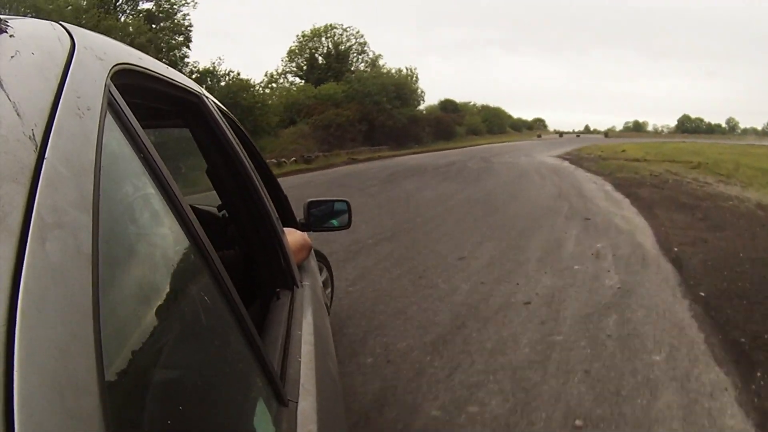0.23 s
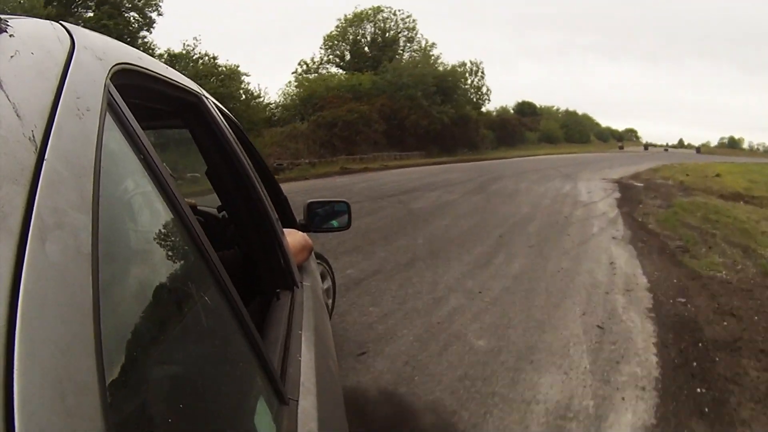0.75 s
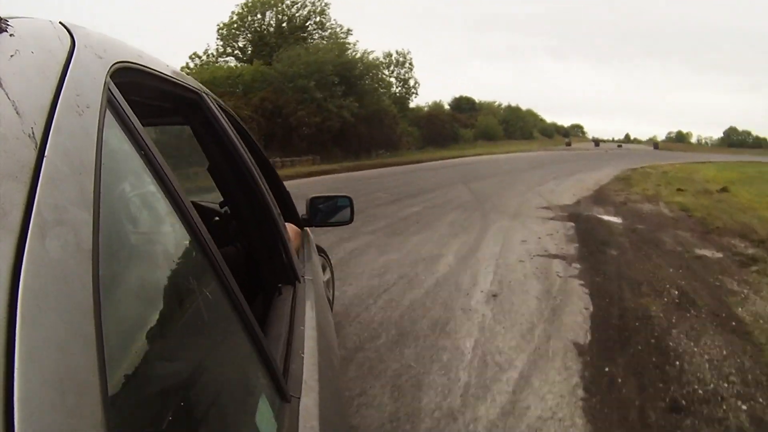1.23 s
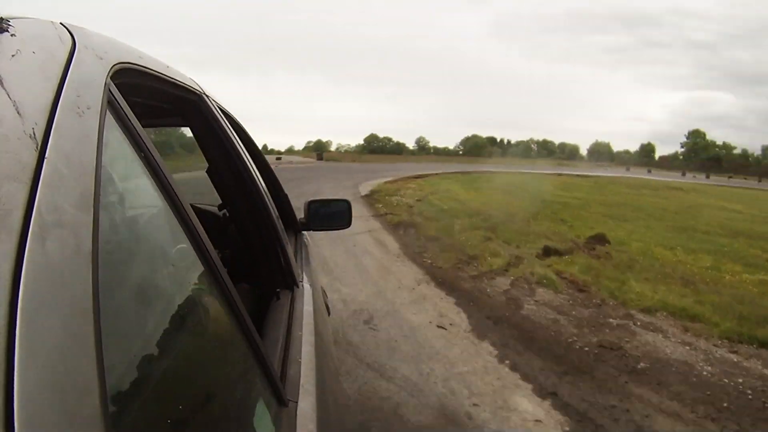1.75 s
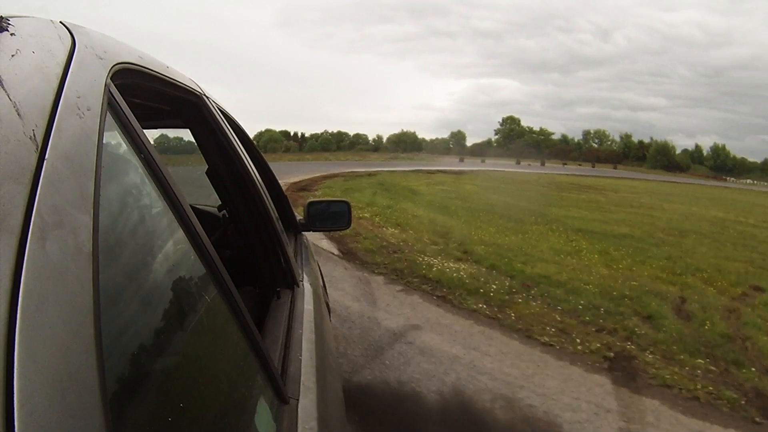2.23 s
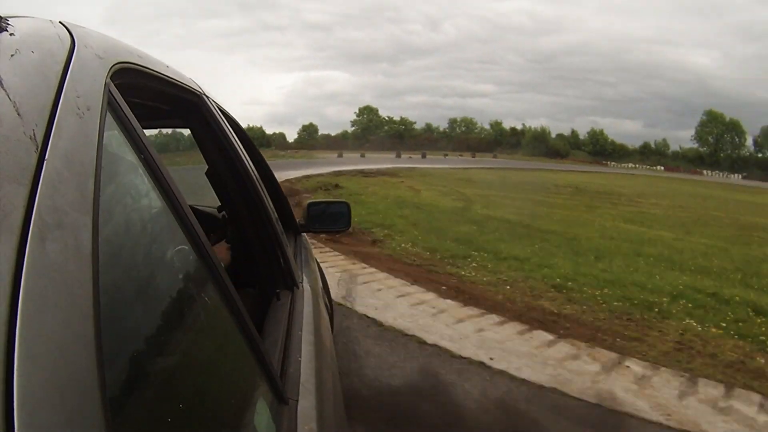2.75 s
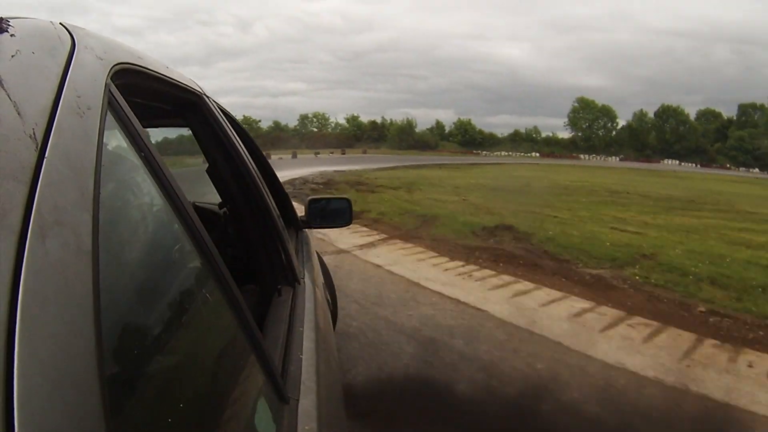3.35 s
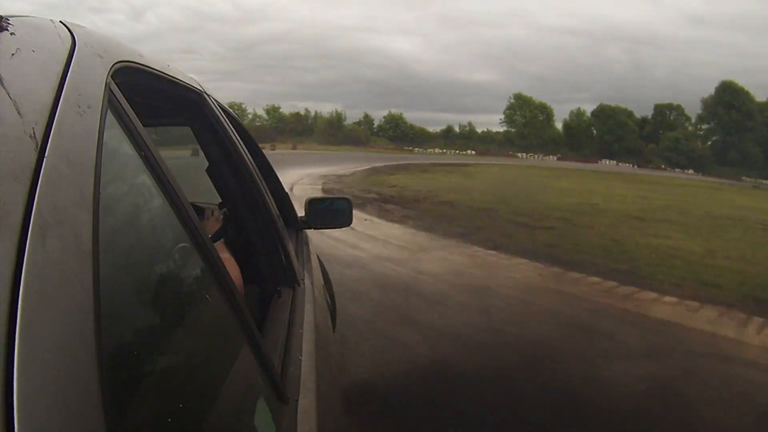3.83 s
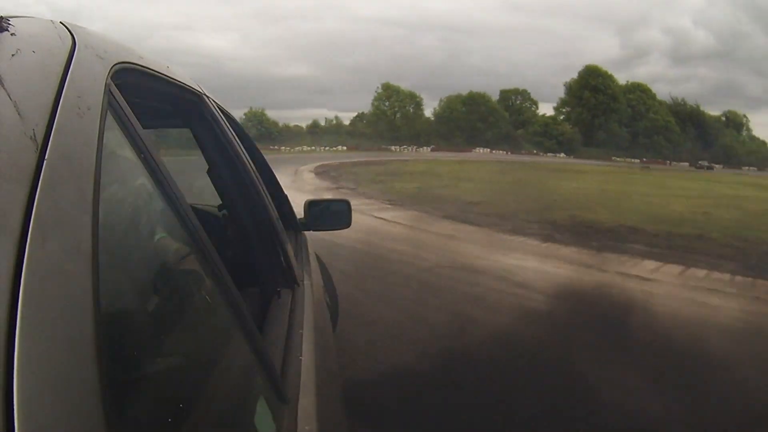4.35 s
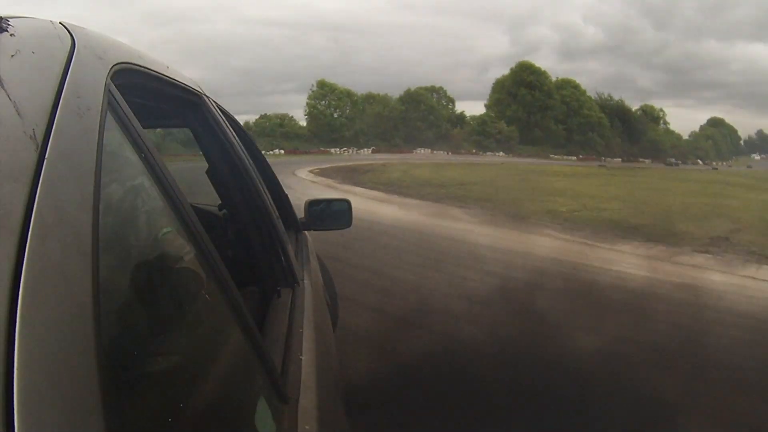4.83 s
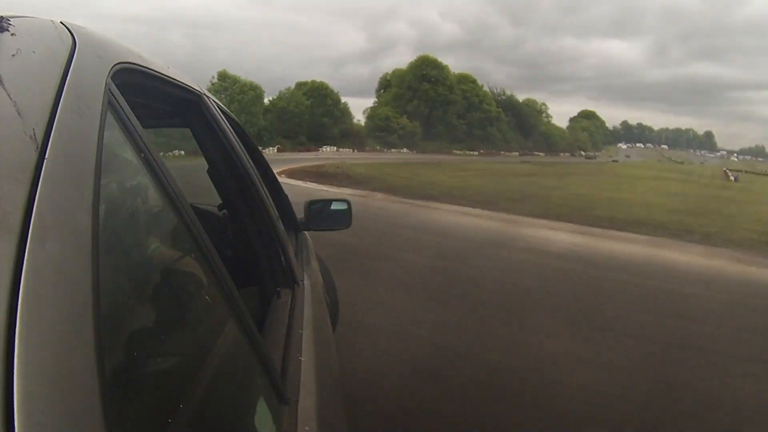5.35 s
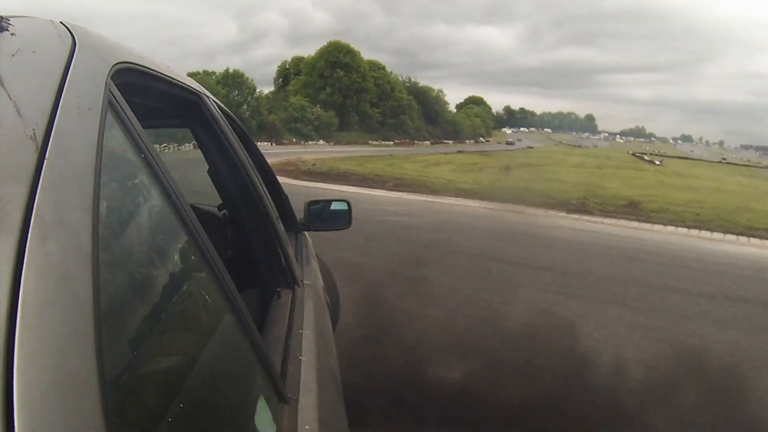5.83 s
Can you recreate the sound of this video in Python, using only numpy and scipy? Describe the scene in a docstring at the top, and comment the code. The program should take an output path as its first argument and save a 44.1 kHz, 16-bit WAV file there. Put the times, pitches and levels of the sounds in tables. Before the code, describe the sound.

Outdoors, from a microphone on the flank of a drifting diesel car, close and dry, the same in both channels. From 0 to 1.4 s a rear tyre squeals around 1050 Hz, wavering and rough, with a hoarse second tyre, rasping rubber and bright gritty hiss over a low engine drone that sinks. Around 1.2-1.5 s the engine drops sharply, short yelps slip out, bumps thud in the body panels and the squeal dies. At about 1.7 s a gust rumbles as the squeal returns, dipping near 1200 Hz, then rising toward 1330 Hz by 2.5 s while the revs climb. From 2.6 to 5.4 s it stutters in quick, uneven throbs amid heavy scrubbing, road roar, body boom and wind buffets. From 5.4 s the engine eases lower and the squeal becomes louder and more continuous, sliding down slightly and still sounding at 6 s.

```python
"""Turbodiesel drifting through an S-bend

A six-cylinder car is heard at a housing on its flank. Its rear tyres squeal by stick-slip in one slide,
grip briefly as the car swings over, then squeal higher, in throbs; a second, hoarse tyre adds noisy tones.
Scrubbing rubber is noise through tread resonances, grit is clumped hiss that throbs at the firing rate.
The exhaust is a sum of harmonic orders; wind, body boom, road roar and panel thuds are shaped noise."""
import sys
import numpy as np
from scipy import signal
from scipy.fft import rfft, irfft, next_fast_len
from scipy.io import wavfile
from scipy.ndimage import uniform_filter1d, minimum_filter1d

SR = 44100
rng = np.random.default_rng(int(sys.argv[2]) if len(sys.argv) > 2 else 0)


def int16_out(signal):
    """Quantize to a 16-bit WAV file."""
    q = np.round(np.clip(np.atleast_2d(signal).T, -1, 1) * 32767)
    wavfile.write(sys.argv[1], SR, q.astype(np.int16))


N = 268128
TIME = np.arange(N) / SR


def from_db(db):
    """Logarithmic level: 20 dB is a factor of ten in amplitude."""
    return 10 ** (np.asarray(db) / 20)


def rms_one(x):
    """Power normalisation: the mean square becomes one."""
    return x / np.sqrt(np.mean(x ** 2) + 1e-20)


def in_time(rows):
    """Linear interpolation: the columns after t/s, sample by sample."""
    t, *columns = np.transpose(rows)
    return [np.interp(TIME, t, column) for column in columns]


def swells(centre_s, length_s):
    """Gaussian surge of height 1, at half power over the given length."""
    return np.exp(-2 * np.log(2) * ((TIME - centre_s) / length_s) ** 2)


def drift(rate_hz):
    """Low-pass noise: a smooth random wander of spread 1, made at a twentieth of the sample rate."""
    pole = np.exp(-40 * np.pi * rate_hz / SR)
    noise = rng.standard_normal(N // 20 + 2002)
    slow = signal.lfilter([1], [1, -2 * pole, pole * pole], noise)[2000:]
    return np.interp(np.arange(N) / 20, np.arange(len(slow)), rms_one(slow))


def coloured(x, spectrum):
    """Spectral shaping: a gain through (f/Hz, level/dB) points, with falling skirts; unit power."""
    size = next_fast_len(N)
    hz = np.maximum(np.arange(size // 2 + 1) * SR / size, 1)
    points, db = np.transpose(spectrum)
    gain = from_db(np.interp(np.log(hz), np.log(points), db))
    skirts = np.minimum(hz / points[0], 1) ** 2 * np.minimum(points[-1] / hz, 1) ** 2
    return rms_one(irfft(rfft(x, size) * gain * skirts, size)[:N])


def resonances(modes, drive):
    """Modal response: steep resonances, each shaken by its own noise under a common drive; unit power."""
    total = 0
    for hz, width_hz, db in modes:
        pole = np.exp(-np.pi * width_hz * np.sqrt(2) / SR)
        b = (1 - pole * pole) / 2 * np.array([1, 0, -1])
        a = [1, -2 * pole * np.cos(2 * np.pi * hz / SR), pole * pole]
        once = signal.lfilter(b, a, drive * rng.standard_normal(N))
        total = total + from_db(db) * signal.lfilter(b, a, once)
    return rms_one(total)


def phase_of(hz):
    """Phase is the running integral of frequency."""
    return 2 * np.pi * np.cumsum(hz) / SR


def tone(phase, flutter, flutter_hz):
    """Narrow-band modulation: a line whose strength and phase shake at random; unit power."""
    in_phase = (1 + flutter * drift(flutter_hz)) * np.sin(phase)
    return rms_one(in_phase + flutter * drift(flutter_hz) * np.cos(phase))


# spectrum of the wind on the housing: f/Hz, relative level/dB
BUFFET = [(12, -2.5), (26, 1), (32, -4.5), (50, -8), (70, -15.5), (110, -22.5)]
# gusts, the longest as the car swings over: t/s, length/s, rise of level/dB
GUSTS = [(1.7, 0.38, 6.5), (3.448, 0.13, 6.5), (4.101, 0.17, 3), (4.744, 0.096, 5.5)]


def wind():
    """Turbulent pressure: gusts raise low-frequency noise on the housing."""
    level_db = -23.5 + sum(rise_db * swells(s, length) for s, length, rise_db in GUSTS)
    return from_db(level_db) * coloured(rng.standard_normal(N), BUFFET)


# spectrum of the body's boom: f/Hz, relative level/dB
BOOM = [(50, -15.5), (66, -2), (77, 5.5), (88, -2), (105, -34), (125, -6.5), (145, -5), (180, -14),
        (215, -10.5), (280, -41), (450, -42.5)]
# course of the boom, before a common 1 dB gain: t/s, level/dB
BOOM_LEVEL = [(0.0, -26), (0.49, -22.5), (0.69, -28), (1.52, -20), (1.71, -28), (1.96, -22.5),
              (2.22, -26.5), (2.45, -21), (2.84, -29), (2.95, -20.5), (3.69, -33), (3.83, -22.5),
              (5.2, -28.5), (6.08, -24.5)]


def body_boom():
    """Enclosure resonance: low noise gathers in a few peaks and its level rises and falls."""
    level_db, = in_time(BOOM_LEVEL)
    return from_db(level_db + 1) * coloured(rng.standard_normal(N), BOOM)


# spectrum of the road roar: f/Hz, relative level/dB
ROAD = [(100, 15), (210, 12.5), (270, 9.5), (330, 10.5), (400, 5), (480, 6.5), (620, -1), (900, -9.5),
        (2000, -6.5)]


def road_roar(slip_db, dirt_db, surface_db):
    """Contact noise: the road roars the more with slip, dirt and rough track."""
    # each influence counts by a share of its swing in dB
    level_db = -33 + 0.43 * slip_db + 0.18 * (dirt_db + 45.5) + 0.89 * surface_db
    return from_db(level_db) * coloured(rng.standard_normal(N), ROAD)


# bumps in the track: t/s, length/s, level/dB
BUMPS = [(.52, .06, -23), (1.366, .08, -22.5), (1.53, 0.028, -19)]
# body panels that they set booming: f/Hz, width/Hz, relative level/dB
PANELS = [(81.7, 16, -0.5), (131, 10, -6), (203, 7.6, -4)]


def bumps():
    """Structural resonance: the suspension takes a bump and the panels boom."""
    surges = sum(from_db(db) * swells(s, length) for s, length, db in BUMPS)
    return surges * resonances(PANELS, np.ones(N))


def drone_level(firing_hz, throttle_db):
    """Resonant gain: the drone grows with throttle and near the exhaust's resonance; level in dB."""
    centre_hz, half_width_hz, lift_db = 144.2, 3.9, 7.5
    resonance = 1 / (1 + ((firing_hz - centre_hz) / half_width_hz) ** 2)
    return -28.5 + throttle_db + lift_db * resonance


# exhaust orders beside the firing rate, the sixth: multiple of cam rate, level/dB before pipe and load
EXHAUST = [(3, -33), (5, -39), (7, -43), (8, -47), (9, -49), (10, -44.5), (11, -42.5), (12, -40),
           (15, -56.5), (18, -45.5)]
# how tailpipe and body pass the orders: f/Hz, gain as level/dB
PIPE = [(60, 3.5), (215, -10.5), (248, 3), (275, -3), (310, 1.5), (335, -1.5), (354, -9.5), (375, 2),
        (550, -10)]


def engine(firing_hz, drone_db):
    """Harmonic orders: six firings a cam turn make the drone; unequal cylinders add the orders between."""
    cam_hz = firing_hz / 6 * (1 + .003 * drift(12))
    cam_phase = phase_of(cam_hz)
    drone = from_db(drone_db) * tone(6 * cam_phase, 0.09, 12)
    orders = 0
    for k, db in EXHAUST:
        pipe_db = np.interp(round(k) * cam_hz, *np.transpose(PIPE))
        order = tone(round(k) * cam_phase + rng.uniform(0, 2 * np.pi), .3, 6)
        orders = orders + from_db(db + pipe_db) * order
    # the orders follow the drone's swings by a share in dB
    load_gain = from_db(0.42 * (drone_db - drone_db.mean()))
    return drone + load_gain * orders


# rough patches of track, which throw up more grit: t/s, length/s, rise of level/dB
PATCHES = [(1.741, 0.084, 13.5), (2.74, 0.036, 3), (2.989, 0.03, 0.5), (3.1, .07, 3), (3.277, 0.048, 8),
           (3.913, 0.11, 3.5), (4.671, 0.048, 3), (4.971, 0.077, 6.5)]


def rough_track():
    """Surface roughness: placed patches and chance unevenness, as a rise in dB."""
    patches = sum(rise_db * swells(s, length) for s, length, rise_db in PATCHES)
    return patches + drift(19)


# grit hiss through the housing: f/Hz, relative level/dB
GRIT = [(2500, 2), (4000, -4), (4450, -10), (4800, -6), (5500, -6), (5950, -7), (6350, 6), (7600, -1.5),
        (8300, -7), (9500, -13), (10500, -7), (11200, -15.5), (12300, -14.5), (14000, -31)]
# resonances of the wheel arch: f/Hz, width/Hz, relative level/dB
ARCH = [(722, 37, 2.5), (777, 43, -2.5), (4080, 170, -10.5), (4750, 830, -14.5)]


def grit(hiss_db, firing_hz):
    """Modulated noise: rubber crumbs and road spray off in clumps, throb with firing and ring the arch."""
    clumps = from_db(2.0 * drift(110) + drift(8.9))
    spray = clumps * (1 + 0.37 * np.sin(phase_of(firing_hz)))
    hiss = from_db(hiss_db + 2.5) * coloured(spray * rng.standard_normal(N), GRIT)
    # the arch has a flicker of its own and follows just over half of the hiss's swing in dB
    ringing = resonances(ARCH, from_db(3.0 * drift(54)))
    return hiss + from_db(-19.0 + 0.54 * hiss_db) * ringing


# tread resonances that the scrubbing excites: f/Hz, width/Hz, relative level/dB
TREAD = [(1023, 109, -7.5), (1235, 37, 2.5), (1348, 114, 6), (1531, 87, 3), (1688, 145, 0.5)]
# the higher cluster, the rasp: f/Hz, width/Hz, relative level/dB
RASP = [(2095, 174, 5.5), (2326, 110, 1.5), (2772, 220, 0), (3070, 550, -5.5)]


def scrub(scrub_db, rasp_db, surface_db):
    """Incoherent stick-slip: tread blocks out of step judder and ring in clusters around the squeal."""
    judder = from_db(1.5 * drift(44))
    rubber = from_db(scrub_db) * resonances(TREAD, judder) + from_db(rasp_db) * resonances(RASP, judder)
    return from_db(0.51 * surface_db) * rubber   # about half of the track's rise


# the other rear tyre's pitch, before jitter: t/s, f/Hz
HOARSE_PITCH = [(0, 1326), (1.25, 1353), (2.3, 1314), (3.3, 1468), (3.9, 1480), (4.2, 1298), (4.7, 1287),
                (5.25, 1523), (5.6, 1346)]
# its short yelps as it catches, before waver: t/s, f/Hz, length/s, level/dB
YELPS = [(1.21, 1370, 0.0044, -14), (1.411, 1752, 0.0085, -16.5), (1.43, 2040, 0.017, -24),
         (1.457, 1232, 0.027, -22), (1.707, 1353, 0.018, -13), (1.752, 1117, 0.014, -25),
         (2.043, 1308, 0.0072, -16.5)]


def hoarse_tyre(slip_db):
    """Irregular stick-slip: the other tyre never settles on a clean note, except in brief yelps."""
    hz, = in_time(HOARSE_PITCH)
    level_db = -26.5 + slip_db + 0.002 * (hz - 1277)
    out = from_db(level_db) * tone(phase_of(hz * (1 + .025 * drift(59.0))), 1.0, 110)
    waver = 1 + 0.012 * drift(79)
    for s, pitch_hz, length, db in YELPS:
        out = out + from_db(db) * swells(s, length) * tone(phase_of(pitch_hz * waver), 0.51, 100)
    return out


# the squealing tyre's first slide, before bites and waver: t/s, stick-slip f/Hz, level/dB
FIRST_SLIDE = [(0, 1091, -18.5), (.3, 1038, -17), (.55, 1048, -19), (.7, 1041, -16), (1.1, 1078, -17.5),
               (1.28, 1044, -16.5), (1.43, 1052, -22), (1.47, 1058, -40), (1.53, 1055, -31)]
# its second slide, before bites and waver: t/s, stick-slip f/Hz, level/dB
SECOND_SLIDE = [(1.59, 1500, -44), (1.65, 1434, -35), (1.77, 1222, -19.5), (1.9, 1190, -26.5),
                (2.019, 1175, -22.5), (2.2, 1211, -17), (2.5, 1329, -20.5), (3.151, 1312, -22.5),
                (3.752, 1343, -35), (4.6, 1321, -27), (5.1, 1350, -30.5), (5.39, 1355, -27),
                (5.48, 1314, -16), (5.72, 1250, -17), (6.08, 1259, -18.5)]
FIRST_END_S, SECOND_START_S = FIRST_SLIDE[-1][0], SECOND_SLIDE[0][0]


def slides():
    """Stick-slip needs sliding: pitch and level of the squeal, which dies away in the grip between."""
    hz, level_db = in_time(FIRST_SLIDE + SECOND_SLIDE)
    gripping_s = np.maximum(0, np.minimum(TIME - FIRST_END_S, SECOND_START_S - TIME))
    fade_db_per_s = 497   # with distance from the nearer slide
    return hz, level_db - fade_db_per_s * gripping_s


def held(start_s, length_s):
    """Envelope: linear attack, hold and release of a bite."""
    attack_s, release_s = 0.011, 0.013
    rise = .5 + (TIME - start_s) / attack_s
    fall = (start_s + length_s - TIME) / release_s
    return np.clip(np.minimum(rise, fall), 0, 1)


# bites of the tread in the second slide: t/s, length/s, level/dB before a common 1.5 dB gain
BITES = [(2.572, 0.036, -15), (2.628, 0.052, -16), (2.68, 0.04, -17), (2.73, 0.058, -16),
         (2.822, 0.058, -15), (2.985, 0.032, -16), (3.169, 0.034, -16), (3.295, 0.044, -15),
         (3.386, 0.03, -18), (3.466, 0.06, -16), (3.548, 0.03, -18), (3.606, 0.042, -14),
         (3.694, 0.034, -17), (3.771, 0.032, -15), (4.003, 0.034, -18), (4.173, 0.04, -16),
         (4.242, 0.03, -16), (4.316, 0.066, -15), (4.406, 0.05, -16), (4.476, 0.04, -17),
         (4.566, 0.054, -16), (4.645, 0.084, -17), (4.793, 0.06, -15), (4.873, 0.032, -19),
         (5.051, 0.066, -15), (5.13, 0.046, -15), (5.204, 0.07, -13), (5.288, 0.058, -14),
         (5.368, 0.052, -14)]


def bite_strength():
    """Load on the contact: amplitude that the bites add."""
    return sum(from_db(db + 1.5) * held(s, length) for s, length, db in BITES)


def biting():
    """Contact state: 1 while the tread bites, 0 in between."""
    return np.minimum(sum(held(s, length) for s, length, db in BITES), 1)


def squeal_pitch(hz):
    """Frequency pulling: the note sags around each bite's onset and pulls up again."""
    depth_hz, decay_s = 29.85, .01
    sag = sum(np.exp(-np.abs(TIME - s) / decay_s) for s, length, db in BITES)
    return hz - depth_hz * sag


def squeal(hz, level_db):
    """Stick-slip oscillation: tread sticks and slips at a wavering pitch; a hard bite makes it louder."""
    # the higher the note, the purer; the overtones also dull as the first slide ends
    overtone_db = -1.5 - 0.0436 * (hz - 1013)
    overtone_db = overtone_db - 7.5 * swells(FIRST_END_S, 0.31)
    strength = np.hypot(from_db(level_db), bite_strength())
    # coarse asphalt shakes the grip, less in a bite: where it loosens the note thins and jumps up
    loose = 1 - 0.44 * biting()
    grip = loose * (.5 * drift(30) + .85 * drift(110))
    waver = loose * (.012 * drift(70) + .006 * drift(10)) - .005 * grip
    phase = phase_of(squeal_pitch(hz) * (1 + waver))
    shake = rms_one(np.maximum(1 + .32 * grip, .1))
    fundamental = tone(phase, .25 * loose, 130)
    # the second partial frays as the note is driven higher; the third lies 90 Hz sharp
    spread_hz = np.interp(hz, [1050, 1200], [14, 75])
    second = tone(2 * phase + phase_of(spread_hz * drift(90)), .45, 150)
    third = tone(3 * phase + phase_of(np.full(N, 90.0)), 1.0, 50)
    low_pass = signal.cheby1(8, .5, 3400, fs=SR, output="sos")
    overtones = signal.sosfilt(low_pass, second + from_db(-11) * third)
    return strength * shake * (fundamental + from_db(overtone_db) * overtones)


# the engine: t/s, firing f/Hz, throttle as relative level/dB
REVS = [(0, 188, 1), (.28, 173, -5), (.6, 171, -5.5), (1.05, 163, -0.5), (1.25, 150, -25), (1.47, 123, -5),
        (1.8, 125, 2), (1.95, 131, -8), (2.2, 143, 4), (2.7, 166, -3), (3.3, 171, 3), (3.55, 170, -2.5),
        (3.97, 177, 4.5), (4.5, 165, -1), (4.8, 168, 1.5), (5.3, 163, 0), (5.7, 144, -3), (6.08, 147, -1.5)]
# the sliding rubber, before rough track: t/s, scrub level/dB, rasp level/dB
SLIP = [(0, -23.5, -20), (.55, -27.5, -27), (1, -27.5, -25), (1.2, -23.5, -23.5), (1.42, -29.5, -33.5),
        (1.53, -38, -36), (1.64, -36.5, -42), (1.9, -27.5, -33.5), (2.24, -21.5, -26.5),
        (2.9, -21.5, -29.5), (3.5, -22.5, -29), (4.1, -21.5, -26.5), (4.5, -19, -27), (4.97, -19.5, -29.5),
        (5.15, -24, -28.5), (5.35, -25, -26.5), (5.5, -20, -26), (6.08, -20.5, -26)]
# loose dirt under the tyres, as its hiss before gain and rough track: t/s, level/dB
DIRT = [(0, -32.5), (.55, -36.5), (1, -37.5), (1.15, -49.5), (1.35, -56), (1.95, -56), (2.25, -44),
        (2.8, -41), (3.6, -42), (4.4, -43), (4.9, -44.5), (5.5, -52), (6.08, -48)]


def scene():
    """Superposition: all sources add at one microphone, alike in both channels."""
    firing_hz, throttle_db = in_time(REVS)
    scrub_db, rasp_db = in_time(SLIP)
    dirt_db, = in_time(DIRT)
    surface_db = rough_track()
    slip_db = np.minimum(rasp_db + 28.5, 0)   # 0 at full slip, where the rasp reaches -28.5 dB
    background = wind() + body_boom() + road_roar(slip_db, dirt_db, surface_db)
    car = bumps() + engine(firing_hz, drone_level(firing_hz, throttle_db))
    rubber = grit(dirt_db + surface_db, firing_hz) + scrub(scrub_db, rasp_db, surface_db)
    tyres = hoarse_tyre(slip_db) + squeal(*slides())
    mix = background + car + rubber + tyres
    return np.array([mix, mix])


def record(dry):
    """Peak limiting and band limiting: fast gain holds down peaks; a steep filter cuts the top."""
    allowed = np.minimum(1, .82 / (np.abs(dry).max(axis=0) + 1e-9))
    gain = uniform_filter1d(minimum_filter1d(allowed, size=400), size=400)   # about 9 ms each
    low_pass = signal.ellip(10, .1, 90, 14000, fs=SR, output="sos")
    return signal.sosfilt(low_pass, dry * gain)


dry = scene()
out = record(dry)
int16_out(out)
```